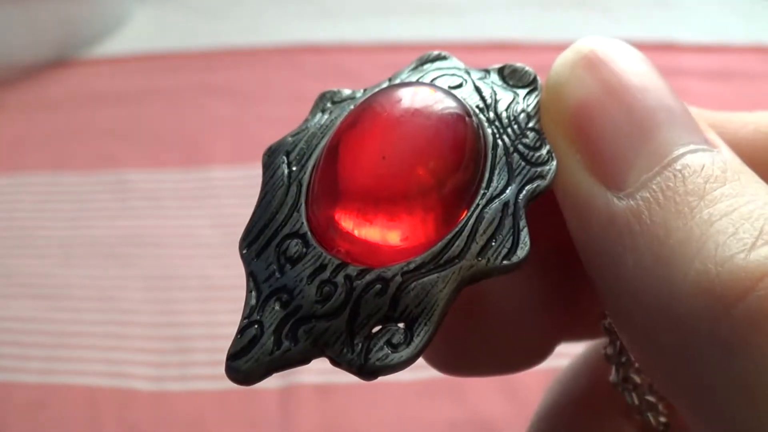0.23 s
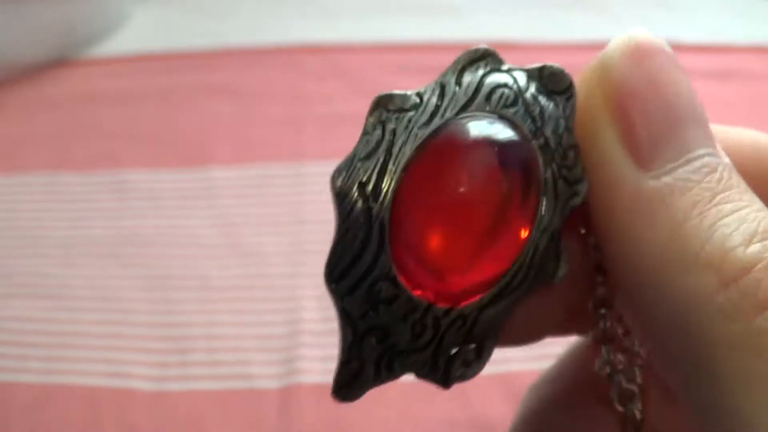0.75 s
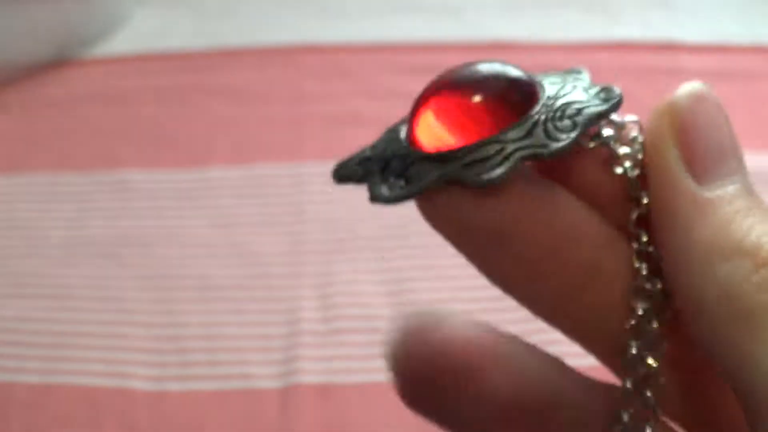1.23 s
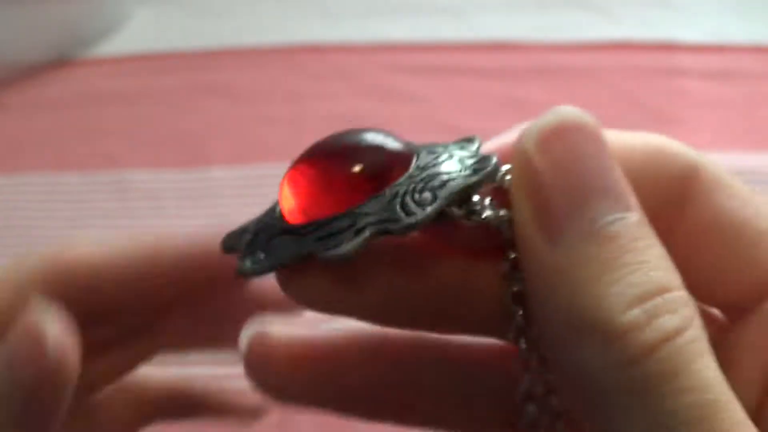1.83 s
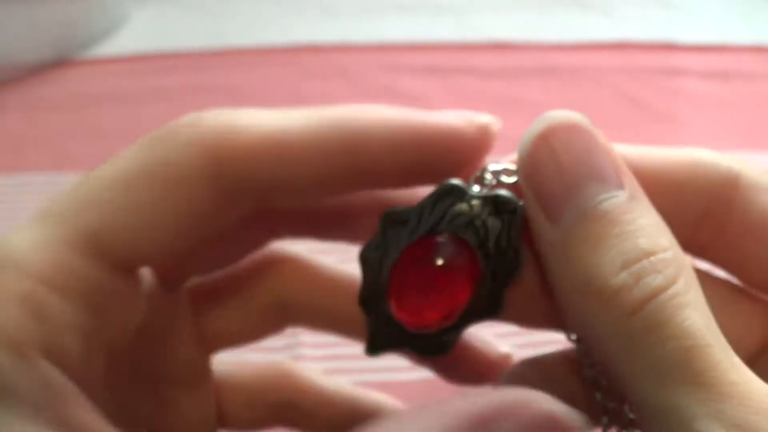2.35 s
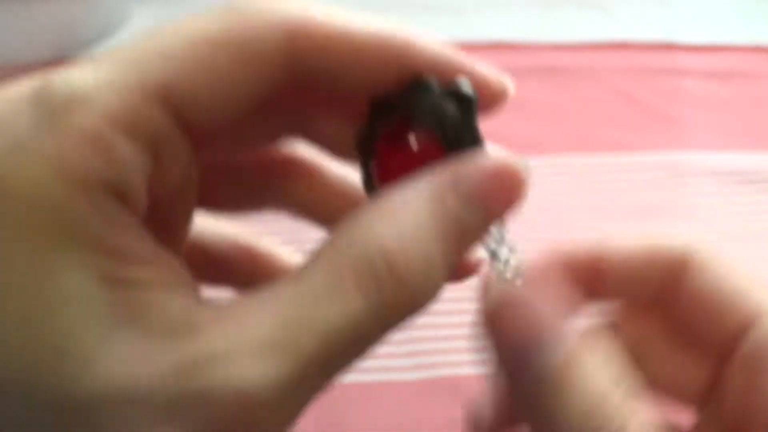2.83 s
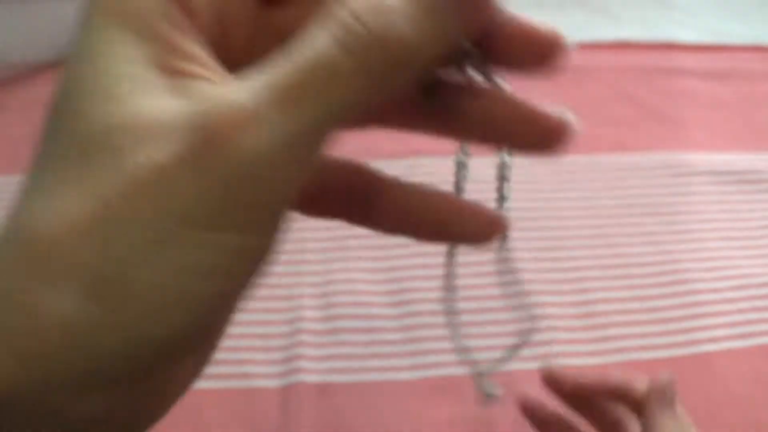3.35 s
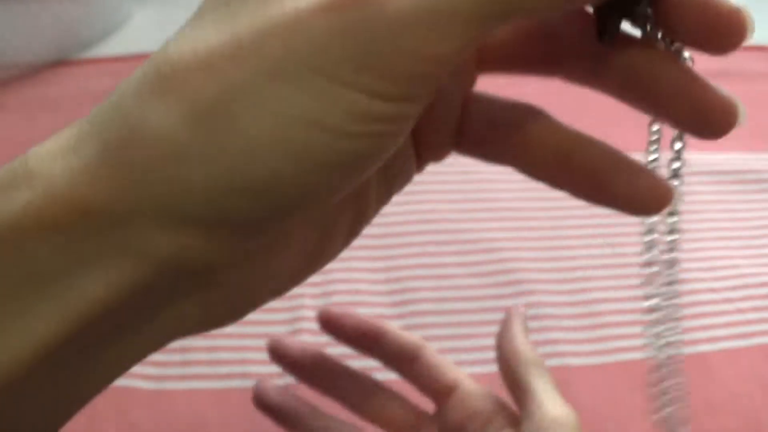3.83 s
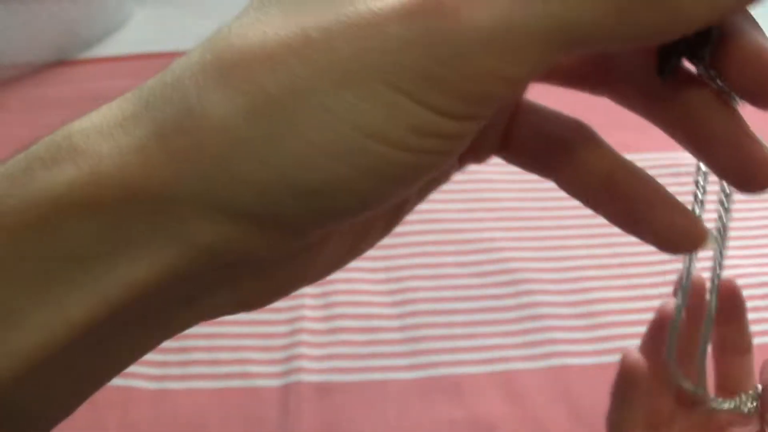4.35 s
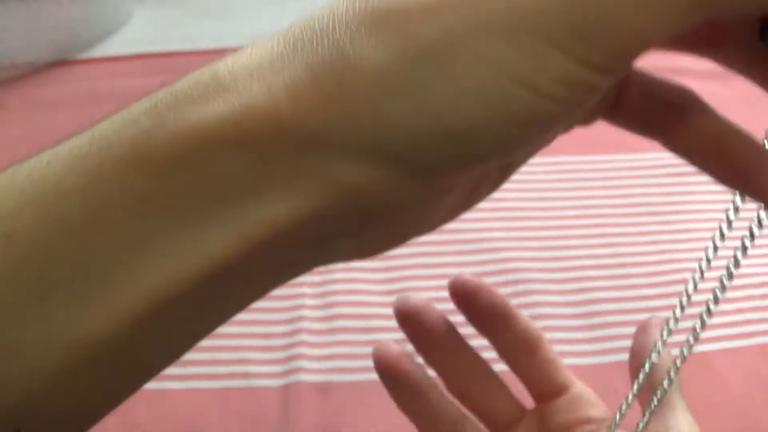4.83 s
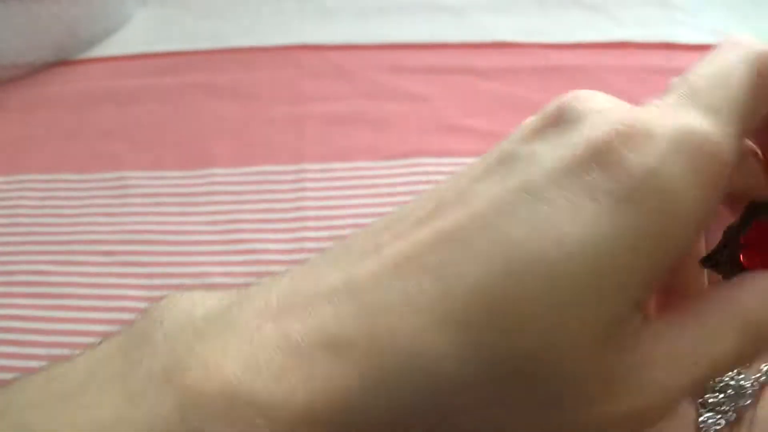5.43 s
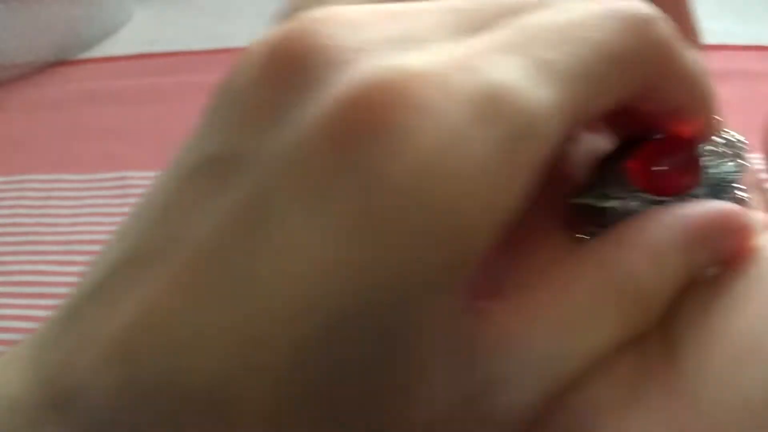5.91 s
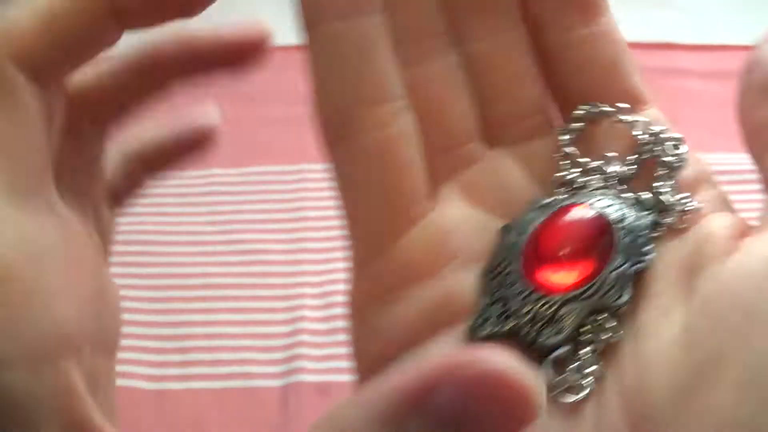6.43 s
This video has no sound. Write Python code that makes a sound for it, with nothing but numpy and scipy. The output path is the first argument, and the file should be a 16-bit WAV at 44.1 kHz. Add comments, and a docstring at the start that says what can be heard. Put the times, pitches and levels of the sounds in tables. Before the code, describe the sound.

Close stereo microphone in a quiet furnished room with low air noise, faint motor hum and tiny, regular camera focus ticks. A pendant on a fine chain is turned almost silently, then its links clink brightly near two seconds and rattle busily around three. A sparse quiet stretch follows, with faint sliding links, before the pendant drops into the palm in the loudest, sharp jingle near six seconds, followed by a few small ticks.

```python
"""Pendant and chain handled in a quiet room

A pendant on a fine metal chain is turned in the fingers, lifted, and lowered into a palm. Links clink
singly (damped modes), run in rattles and rustle as they slide (dense random strikes); the pendant lands
on the heap. Skin puffs and nail clicks are short filtered noise. Shaped noise and drifting sines make
the room and its hum; short decaying tones make the faint steps of a camera's focus drive."""
import sys
import numpy as np
from scipy import signal
from scipy.fft import rfft, irfft
from scipy.io import wavfile

SR = 44100
rng = np.random.default_rng(int(sys.argv[2]) if len(sys.argv) > 2 else 0)


def generate_wav(sig):
    """Save sig (samples, or channels by samples) to the path in sys.argv[1] as 16-bit PCM at SR."""
    pcm = np.round(np.clip(np.atleast_2d(sig).T, -1, 1) * 32767).astype(np.int16)
    wavfile.write(sys.argv[1], SR, pcm)


N = 294147
TIME = np.arange(N) / SR

# ring of the links: (nominal frequency [Hz], level [dB], undamped t60 [s])
LINK_RING = [(8500, -8, 0.008), (9400, 1.5, .012), (10300, -1, 0.0073), (10900, -0.5, 0.0072),
             (11260, -0.5, 0.0077), (11950, 0, 0.013), (12800, -15, .005), (13430, 2.5, 0.012),
             (14800, -12, .004)]
# ring of the clasp and the wider rings: (nominal frequency [Hz], level [dB], t60 [s])
CLASP_RING = [(6570, 1, 0.0031), (7500, 3, 0.008), (8100, 3.5, 0.019)]
# duller ring of the pendant and its loop: (nominal frequency [Hz], level [dB], t60 [s])
PENDANT_RING = [(3040, 0, 0.013), (3800, 7.5, 0.0086), (4400, 9, 0.0045), (4990, 9, 0.0096)]
CRACK_GAIN, CRACK_DECAY_S = 1.8, 0.00044  # extra gain at the first instant of a contact, and its decay


def amp(db):
    """Decibels to gain."""
    return 10 ** (np.asarray(db) / 20)


def unit(x):
    """Scales to rms 1."""
    return x / np.sqrt(np.mean(x ** 2) + 1e-20)


def read(points, hz):
    """Reads a spectrum on a log-frequency axis."""
    f, value = np.transpose(points)
    return np.interp(np.log(hz + 1), np.log(f), value)


def follow(rows):
    """Interpolates (time, value) rows at every sample."""
    return np.interp(TIME, *np.transpose(rows))


def add(mix, s, sound):
    """Mixes a sound in at time s."""
    part = mix[max(round(s * SR), 0):][:len(sound)]
    part += sound[:len(part)]


def drift(rate_hz):
    """Slow random motion of rms 1: noise under a Gaussian low-pass."""
    hz = np.fft.rfftfreq(N, 1 / SR)
    return unit(irfft(rfft(rng.standard_normal(N)) * np.exp(-(hz / rate_hz) ** 2), N))


def air(level_db=-58):
    """Room noise with a slight swell, shared by both sides in the bass and diffuse in the middle."""
    # spectrum before level scaling: (frequency [Hz], relative density [dB])
    spectrum = [(20, -22), (50, -10.5), (165, -4.5), (290, -8.5), (490, -13.5), (800, -15), (1580, -19),
                (2800, -23), (4000, -22), (7000, -23.5), (12000, -25), (15800, -25)]
    # resonant humps: (frequency [Hz], width [Hz], boost [dB])
    humps = [(264, 17, 4.5), (672, 110, 3.5), (2070, 66, 6), (2860, 930, 4)]
    # left-right correlation: (frequency [Hz], correlation [-1..1])
    likeness = [(30, 0.93), (130, 1), (350, 0.8), (700, 0.32), (1400, 0.044), (2800, 0.27), (5500, 0.75),
                (12000, 1)]
    # (time [s], level change [dB])
    swell = [(0, -0.5), (1.4, 0), (3, 0.64), (4.3, 0), (5.9, 2), (6.67, 0)]
    hz = np.fft.rfftfreq(N, 1 / SR)
    hump_db = sum(db / (1 + (2 * (hz - f) / width) ** 2) for f, width, db in humps)
    shape = amp(read(spectrum, hz) + hump_db)
    same = np.clip(read(likeness, hz), -1, 1)
    mid, side = rfft(rng.standard_normal((2, N))) * shape
    mid = irfft(mid, N)
    side = irfft(side * np.sqrt((1 - same) / (1 + same)), N)
    return amp(level_db + follow(swell)) * np.array([mid + side, mid - side]) / mid.std()


def hum(drone_hz=200, drone_db=-2, whine_hz=15625, whine_db=-68):
    """Drifting lines of a household appliance, two harmonics of a second motor, a thin electronic whine."""
    # steady lines: (frequency [Hz], rms level [dB])
    steady = [(59.5, -77), (100, -73), (151, -75), (265, -72.5), (812, -77.5)]
    # line that swells, before drone_db: (time [s], level [dB])
    drone = [(0, -71), (3.4, -68), (3.9, -62.5), (4.8, -59), (6.67, -62)]
    # second motor: (time [s], speed [turns/s], rms level per harmonic [dB])
    motor = [(0, 92.5, -68), (2.1, 103, -68.5), (3.2, 98.6, -67.5), (4.3, 95, -77), (6.67, 114, -82)]
    s, speed, db = np.transpose(motor)
    speed_hz, motor_gain = np.interp(TIME, s, speed), amp(np.interp(TIME, s, db))
    lines = [(hz, amp(db)) for hz, db in steady]
    lines += [(drone_hz, amp(follow(drone) + drone_db))]
    lines += [(2 * speed_hz, motor_gain), (3 * speed_hz, motor_gain)]
    motors = np.zeros(N)
    for hz, gain in lines:
        level = gain * (1 + 0.25 * drift(4.2))
        phase = 2 * np.pi * np.cumsum(hz + 0.69 * drift(4.22)) / SR
        motors += level * np.sin(phase)
    whine = np.sin(2 * np.pi * whine_hz * TIME)
    return np.sqrt(2) * (motors + amp(whine_db) * whine)  # sqrt(2): rms to peak


def focus_drive(clock_s=0.04, step_db=5, ring_hz=2760, between_hz=2900, upper_hz=3080,
                decay_s=0.0032, rise_s=0.00024, uneven_db=1.6):
    """The lens moves in runs of evenly timed steps, strong and light in turn; each step is a brief ring."""
    # before step_db: (first step [s], run end [s], strong step level [dB], light step level [dB])
    runs = [(0.073, .77, -54.5, -72), (0.794, 1.73, -56.5, -61), (1.753, 3.05, -57, -66),
            (3.073, 3.41, -57, -65), (3.539, 3.56, -60, -66), (3.634, 4.22, -58, -67),
            (4.275, 4.53, -55, -60), (4.551, 5.17, -60, -61), (5.193, 6.13, -57, -61.5),
            (6.154, 6.65, -59, -63)]
    out, t = np.zeros(N), np.arange(900) / SR
    envelope = np.exp(-t / decay_s) * (1 - np.exp(-t / rise_s))
    for first, last, strong_db, light_db in runs:
        steps = np.arange(first, last, clock_s)
        for beat, s in enumerate(steps):
            tuning, force, upper = rng.standard_normal(3)
            light = beat % 2 and s < steps[-1]  # a run ends on a strong step
            hz, db = (between_hz, light_db) if light else (ring_hz, strong_db)
            wave = np.sin(2 * np.pi * hz * (1 + 0.014 * tuning) * t)
            wave += 0.29 * upper * np.sin(2 * np.pi * upper_hz * t)
            add(out, s, amp(db + step_db + uneven_db * force) * wave * envelope)
    return out


def ring(modes, bright_hz, focus_hz, detune=0.05, uneven_db=6.5, crack=0, damping=1,
         contact_s=0.00014, size=1400):
    """One contact, energy 1: randomly tuned and struck modes, loudest near bright_hz; damping shortens them."""
    hz, db, t60 = np.transpose(modes)[:, :, None]
    tuning, strength, place = rng.standard_normal((3, len(modes), 1))
    t = np.arange(size) / SR
    gain = amp(db + uneven_db * strength - 60 * damping * t / t60)
    gain /= 1 + ((hz - bright_hz) / focus_hz) ** 2
    wave = (gain * np.sin(2 * np.pi * (hz * (1 + detune * tuning) * t + place))).sum(0)
    wave *= 1 - np.exp(-(t / contact_s) ** 2)  # the contact takes a moment to build
    wave *= 1 + crack * np.exp(-t / CRACK_DECAY_S)
    return wave / np.linalg.norm(wave)


def tick(decay_s=0.002, size=1400):
    """The dry broadband snap of metal meeting metal: decaying band-passed noise of energy 1."""
    snap = rng.standard_normal(size) * np.exp(-np.arange(size) / SR / decay_s)
    band = signal.butter(3, [3000, 12000], "band", fs=SR, output="sos")
    snap = signal.sosfilt(band, snap)
    return snap / np.linalg.norm(snap)


def chatter(wave, share, gap_s=0.0011):
    """A contact rebounds twice within a moment, each time weaker by share. Energy 1."""
    out = wave.copy()
    for k, wait in enumerate(np.cumsum(rng.uniform(0.44, 1.3, 2))):
        add(out, wait * gap_s, share ** (k + 1) * wave)
    return out / np.linalg.norm(out)


def clinks(link_db=9, heavy_db=-4.0, tick_db=12, lag_s=0.00086, soft_rebound=0.35,
           hard_rebound=0.7, soft_damping=1.2, in_palm_s=5.8):
    """Each strike rings a link, with a duller clasp, pendant and contact knock; heavy ones rebound harder."""
    # before gains and lag: (time [s], link level [dB], ring focus [Hz], knock level [dB], knock focus [Hz])
    strikes = [(.578, -25.5, 11200, -56, 4200), (1.035, -40.5, 11500, -61, 3500),
               (1.096, -38, 11000, -68, 3980), (1.146, -37, 11800, -61, 4000),
               (1.491, -35.5, 8850, -54, 4500), (1.969, -31, 11000, -50, 5000),
               (1.9802, -15.5, 11700, -40, 3700), (2.038, -14.5, 11900, -48, 3100),
               (2.046, -17, 11900, -54, 3100), (2.0532, -22, 11000, -55, 5000),
               (2.0616, -26, 11000, -61, 4500), (2.276, -34, 9100, -60, 4000),
               (2.355, -31.5, 11000, -60, 4000), (2.387, -40, 11000, -66, 4000),
               (2.403, -39, 11500, -68, 4000), (2.438, -30, 11000, -57, 3800),
               (2.466, -23, 9900, -48, 3800), (2.511, -33.5, 11100, -57, 4000),
               (2.569, -34, 12500, -67, 4000), (2.627, -30, 11500, -64, 4000),
               (2.639, -17.5, 11600, -52, 4200), (2.662, -18, 12300, -61, 4000),
               (2.667, -16, 12200, -50, 4000), (2.6705, -15, 12300, -57, 4000),
               (2.679, -27, 12000, -58, 4200), (2.686, -23, 12500, -48, 4200),
               (2.697, -22, 9400, -48, 4050), (2.704, -19, 11900, -59, 4500),
               (2.709, -15, 12200, -47, 4170), (2.711, -18, 11900, -52, 3000),
               (2.718, -37, 12000, -57, 4000), (2.744, -40, 11500, -65, 4000),
               (2.784, -26, 10400, -60, 4200), (2.7946, -28, 10600, -59, 4200),
               (2.810, -35, 10800, -60, 4200), (2.8605, -32, 10300, -65, 4200),
               (2.873, -21.5, 11000, -63, 4500), (2.904, -33, 10600, -58, 4500),
               (2.913, -22, 10700, -46, 4500), (2.924, -31, 11000, -58, 4500),
               (2.931, -27, 10500, -45, 4480), (2.940, -33, 10500, -58, 4500),
               (3.005, -28, 10400, -53, 4500), (3.0141, -17.5, 10000, -47, 4500),
               (3.033, -40, 10500, -62, 4500), (3.046, -42, 10500, -64, 4500),
               (3.0947, -39, 10000, -62, 4500), (3.116, -39, 10000, -60, 4500),
               (3.126, -32, 10500, -51, 5000), (3.137, -22, 10400, -48, 5000),
               (3.144, -30, 10000, -58, 4500), (3.150, -14.5, 10100, -58, 5000),
               (3.179, -34, 9700, -63, 4000), (3.200, -24, 9600, -54, 3100), (3.206, -18, 10600, -47, 3000),
               (3.2082, -27, 10500, -48, 3000), (3.225, -19, 11000, -50, 3000),
               (3.2412, -29, 10600, -52, 4500), (3.274, -34, 9400, -54, 3000),
               (3.284, -38, 9400, -64, 3000), (3.3214, -42, 10000, -68, 4000),
               (3.3315, -43, 10000, -68, 4000), (3.4141, -31, 10000, -66, 4000),
               (3.4625, -39, 10800, -68, 4000), (3.5263, -45, 10500, -70, 4000),
               (3.540, -33.5, 10500, -67, 4000), (3.617, -38, 11300, -62, 4000),
               (3.6254, -37, 11200, -64, 4000), (3.750, -38, 9150, -57.5, 4000),
               (3.9957, -41, 9800, -61, 4000), (4.0746, -42, 10800, -72, 4000),
               (4.092, -41, 10600, -72, 4000), (5.1451, -41, 11000, -68, 4000),
               (5.152, -36.5, 10500, -68, 4000), (5.3027, -38, 10900, -72, 4000),
               (5.356, -43, 10900, -73, 4000), (5.369, -49, 10800, -74, 4000),
               (5.3871, -42, 10600, -74, 4000), (5.470, -34, 10900, -75, 4000),
               (5.6011, -41, 10200, -70, 4000), (5.634, -29, 9800, -62, 4000),
               (5.679, -30, 9800, -66, 4000), (5.690, -33, 12200, -64, 4000),
               (5.7015, -24.5, 10400, -56, 4000), (5.709, -33, 10500, -63, 4000),
               (5.733, -28, 12000, -50, 4000), (5.745, -35, 11800, -63, 4000),
               (5.7525, -31, 11500, -60, 4000), (5.821, -39, 11500, -68, 4000),
               (5.901, -16.5, 10300, -54, 4500), (5.908, -16, 11000, -46, 3000),
               (5.915, -22, 10800, -43.5, 3000), (5.947, -34, 10800, -60, 4000),
               (5.962, -32, 10800, -51, 3980), (6.015, -0.5, 10900, -38, 3800),
               (6.024, -7, 11200, -47, 3800), (6.0263, -3, 11000, -43, 3800),
               (6.0303, -4, 11300, -46, 3800), (6.038, -2.5, 11200, -38, 3800),
               (6.045, -18, 11200, -45, 3800), (6.054, -2.5, 10000, -39.5, 4370),
               (6.061, -1, 11600, -37, 4400), (6.065, 0, 11700, -41, 4200), (6.067, -3, 11800, -38, 3800),
               (6.088, -16, 11800, -43, 4470), (6.103, -10, 11300, -53, 4500),
               (6.111, -14, 11200, -46, 4300), (6.433, -38.5, 9500, -66, 4500),
               (6.450, -36, 12000, -56, 4500), (6.505, -36.5, 12000, -66, 4500),
               (6.522, -38, 12000, -70, 4530), (6.553, -26, 10100, -47, 4550),
               (6.574, -35, 12000, -61, 4530)]
    out = np.zeros(N)
    for s, peak_db, hz, knock_db, knock_hz in strikes:
        weight = np.interp(peak_db, [-22, -8], [0, 1])
        focus_hz = np.interp(weight, [0, 1], [1900, 950])  # a heavy strike is a purer ping
        # in the palm the clasp is damped; on the heap the links strike the pendant harder
        clasp_db, pendant_db = (23, 13) if s < in_palm_s else (16, 16)
        link = ring(LINK_RING, hz, focus_hz, detune=0.0032, crack=CRACK_GAIN * (1 - weight),
                    damping=soft_damping ** (1 - weight))
        link *= amp(peak_db + link_db + heavy_db * weight)
        clasp = ring(CLASP_RING, 7300, focus_hz=3000, detune=0.013, crack=CRACK_GAIN)
        clasp *= amp(knock_db + clasp_db)
        pendant = amp(pendant_db) * ring(PENDANT_RING, knock_hz, focus_hz=500, detune=0.014)
        knock = amp(knock_db) * (pendant + amp(tick_db) * tick())
        rebound = soft_rebound + weight * (hard_rebound - soft_rebound)
        for part in (link, clasp, knock):
            add(out, s + lag_s, np.linalg.norm(part) * chatter(part, rebound))
    return out


def shimmer(x, detune=0.008, turn_s=0.009, count=8):
    """Strikes set neighbouring links ringing longer; the set of pitches changes every turn_s."""
    # lingering ring of loose links: (nominal frequency [Hz], level [dB], t60 [s])
    modes = [(9400, -2, 0.066), (11000, -0.5, 0.047), (11700, -4, .045), (13600, -9, .035)]
    hz, db, t60 = np.transpose(modes)[:, :, None]
    t = np.arange(SR // 10) / SR
    decay = amp(-60 * t / t60)
    gain = 2 * amp(db) * decay / decay.sum(1, keepdims=True)
    out = np.zeros(N)
    for k in range(count):
        tuned_hz = hz * (1 + detune * rng.standard_normal(hz.shape))
        response = (gain * np.cos(2 * np.pi * tuned_hz * t)).sum(0)
        turn = TIME // turn_s % count == k
        out += signal.oaconvolve(x * turn, response)[:N]
    return out


def room(x, t60=0.046, early_db=-22, tail_db=-25, far_db=-38, far_t60=0.14):
    """Quick reflections off the hands, a short tail from things nearby, a furnished room's faint decay."""
    t = np.arange(SR // 2) / SR
    early, tail, far = rng.standard_normal((3, 2, len(t)))
    early = early * np.exp(-t / 0.004) * (t > 0.0008)
    tail = tail * amp(-60 * t / t60) * (t > 0.005)
    far = far * amp(-60 * t / far_t60) * (t > 0.015)
    parts = [(early_db, early), (tail_db, tail), (far_db, far)]
    response = sum(amp(db) * part / np.linalg.norm(part[0]) for db, part in parts)
    return signal.fftconvolve(x[None], response, axes=1)[:, :N]


def collisions(force, per_s, bright_hz, knock_db, knock_hz=4200, snap_db=-22, wander_hz=600,
               damping=1.1, count=24):
    """Many small uneven strikes, shared among links of different colour; force sets envelope and energy."""
    chance, link_share = rng.random((2, len(force)))
    size_db = 6.5 * np.clip(rng.standard_normal(len(force)), -2, 2)
    struck = chance <= max(per_s / SR, np.sort(chance)[2])  # at least three strikes
    hits = force * amp(size_db) * struck
    out = 0
    for k in range(count):
        knock = ring(PENDANT_RING, knock_hz, focus_hz=394, detune=0.025)
        knock += 0.5 * ring(CLASP_RING, 7000, focus_hz=2500)
        own_hz = bright_hz + wander_hz * rng.standard_normal()
        strike = ring(LINK_RING, own_hz, focus_hz=1700, detune=0.007, crack=0.5 * CRACK_GAIN, damping=damping)
        strike += amp(knock_db) * knock + amp(snap_db) * tick(decay_s=0.0005)
        out = out + signal.oaconvolve(hits * (np.floor(link_share * count) == k), strike)
    return out * np.linalg.norm(force) / (np.linalg.norm(out) + 1e-20)


def rustle(level_db=-1, damping=1.7, muted_knock_db=-18, clump_db=-1, clump_hz=30,
           rise_share=0.21, fall_share=0.28, snags_per_s=110, snag_db=-7):
    """Slides swell and fade in stick-slip spurts: skin-muted links tick together, now and then one snags."""
    # before level_db: (time [s], length [s], level [dB], fine contacts [1/s], mean ring focus [Hz])
    slides = [(0.987, 0.23, -64, 900, 11500), (1.984, 0.057, -57, 1300, 11300),
              (2.136, .09, -67, 1000, 11000), (2.419, 0.16, -62, 170, 11000), (2.54, 0.35, -56, 440, 12300),
              (2.758, 0.2, -52, 580, 10700), (2.984, 0.094, -54, 860, 10800),
              (3.075, 0.11, -51.5, 1100, 11000), (3.186, 0.17, -56.5, 450, 9800),
              (3.373, 0.14, -63.5, 380, 10000), (3.981, 0.19, -64, 820, 10500),
              (4.24, .06, -67, 400, 11000), (4.424, 0.071, -61, 1200, 11800),
              (4.746, 0.13, -68.5, 280, 11000), (4.945, 0.19, -64.5, 1500, 11800),
              (5.07, 0.26, -61, 1800, 11000), (5.342, 0.061, -58, 330, 10900),
              (5.58, 0.092, -61, 650, 10000), (5.653, 0.13, -49, 1400, 10200),
              (5.799, 0.14, -62, 1600, 11300), (5.903, 0.14, -55, 900, 10800),
              (6.044, 0.083, -39.5, 1000, 11600), (6.106, 0.059, -60, 1200, 11700),
              (6.408, 0.25, -66.5, 300, 12000)]
    out, spurts = np.zeros(N), amp(clump_db * drift(clump_hz))
    for s, length, db, per_s, hz in slides:
        pull = spurts[round(s * SR):][:int(length * SR)]
        u = np.linspace(0, 1, len(pull))
        fade = np.minimum(np.minimum(u / rise_share, (1 - u) / fall_share), 1)
        force = amp(db + level_db) * unit(pull * fade)
        fine = collisions(force, per_s, hz, muted_knock_db, damping=damping)
        snags = collisions(force, snags_per_s, hz, muted_knock_db, damping=damping, count=8)
        add(out, s, fine)
        add(out, s, amp(snag_db) * snags)
    return out


def hands():
    """Soft dull puffs of skin against skin and against a support: band-passed noise bursts."""
    # (time [s], length [s], rms level [dB], centre [Hz])
    bumps = [(1.04, 0.066, -72, 1200), (1.474, 0.13, -67.5, 750), (2.043, 0.04, -53, 220),
             (4.123, 0.01, -58.5, 2400), (5.188, .19, -58.5, 78), (5.387, 0.11, -62, 50),
             (6.469, 0.075, -61, 403), (6.478, 0.04, -60, 820)]
    out = np.zeros(N)
    for s, length, db, hz in bumps:
        band = signal.butter(2, [hz * 0.6, hz * 1.39], "band", fs=SR, output="sos")
        noise = signal.sosfilt(band, rng.standard_normal(SR))
        span = int(length * SR)
        add(out, s, amp(db) * unit(noise[-span:] * np.hanning(span)))
    return out


def nails(decay_s=0.00074, size=600):
    """A fingernail slips on the pendant's rim: a dry noise click with no ring."""
    # (time [s], energy level [dB], low edge [Hz], high edge [Hz])
    slips = [(1.067, -33, 500, 4500), (1.121, -33.5, 700, 10000), (3.2937, -33.5, 900, 8000)]
    out = np.zeros(N)
    for s, db, low_hz, high_hz in slips:
        snap = rng.standard_normal(size) * np.exp(-np.arange(size) / SR / decay_s)
        band = signal.butter(1, [low_hz, high_hz], "band", fs=SR, output="sos")
        snap = signal.sosfilt(band, snap)
        add(out, s, amp(db) * snap / np.linalg.norm(snap))
    return out


def rattles():
    """A few links strike in quick succession as they run over an edge; louder rattles are denser."""
    # before the chain gain:
    # (time [s], length [s], level [dB], mean ring focus [Hz], knock gain [dB], knock focus [Hz])
    runs = [(1.955, 0.032, -52, 10500, -14, 4500), (2.022, .024, -36, 11000, -23, 3050),
            (2.632, 0.066, -43, 12300, -21, 4230), (2.66, 0.012, -35.5, 12000, -27, 4030),
            (2.695, 0.024, -37, 11800, -15.5, 4200), (2.787, 0.033, -50.5, 10700, -17, 4200),
            (3.002, .02, -42.5, 10500, -16, 4570), (3.202, 0.02, -44.5, 10000, -28, 3000),
            (3.213, 0.019, -43, 11000, -28, 3000), (3.412, 0.011, -46, 9800, -29, 3600),
            (5.626, 0.023, -45, 10200, -17.5, 3600), (5.7, .012, -41.5, 9600, -17, 3550),
            (5.899, .018, -34.5, 10600, -23.5, 3600), (6.015, 0.061, -35.5, 11500, -18.5, 3800),
            (6.019, 0.022, -27, 11000, -18, 3800)]
    out = np.zeros(N)
    for s, length, db, hz, knock_db, knock_hz in runs:
        force = amp(db) * unit(np.sqrt(np.hanning(int(length * SR))))
        per_s = np.interp(db, [-58, -35], [700, 2600])
        add(out, s, collisions(force, per_s, hz, knock_db, knock_hz, snap_db=-26.5))
    return out


def scene(top_hz=14900, chain_db=-1):
    """Mixes all layers; the chain's direct sound starts near the middle and later leans right."""
    chain = amp(chain_db) * (clinks() + rattles() + rustle())
    low_pass = signal.butter(6, top_hz, fs=SR, output="sos")  # little rings above the top mode
    chain = signal.sosfilt(low_pass, chain + shimmer(chain))
    # left against right: (time [s], level difference [dB])
    balance_db = follow([(2, -1), (3, 0), (5, -4.5), (5.7, -5), (6.1, -2), (6.6, -1.5)])
    direct = chain * amp(np.array([balance_db, -balance_db]) / 2)
    return direct + room(chain) + air() + hum() + hands() + nails() + focus_drive()


def record(dry, edge_hz=16000):
    """Limits the band with a linear-phase low-pass."""
    low_pass = signal.firwin(255, edge_hz, window=("kaiser", 9), fs=SR)
    return signal.oaconvolve(dry, low_pass[None], "same")


dry = scene()
out = record(dry)
generate_wav(out)
```